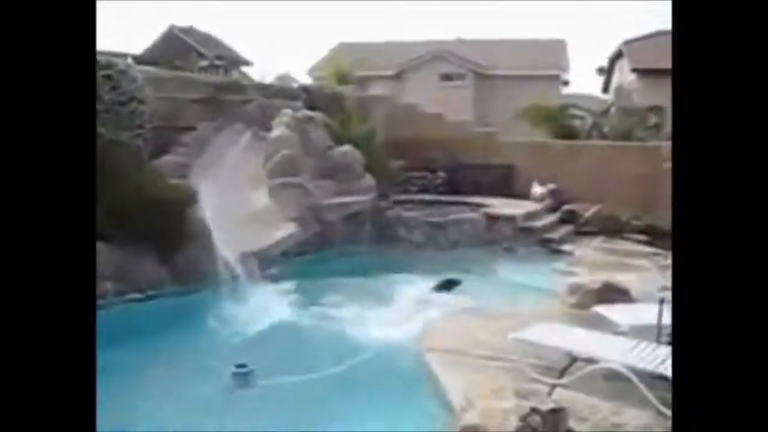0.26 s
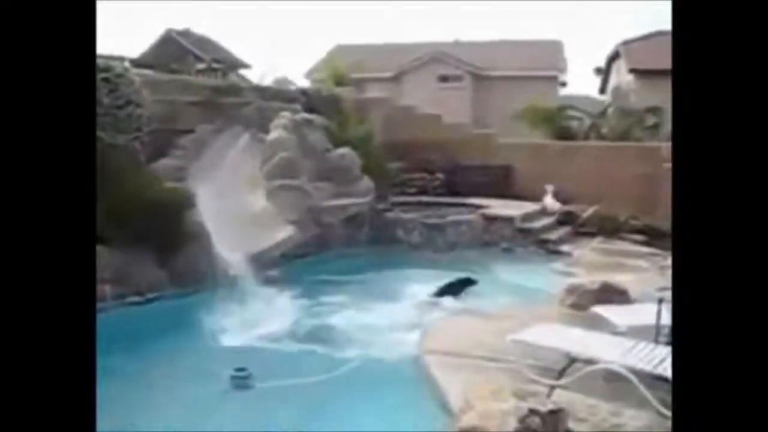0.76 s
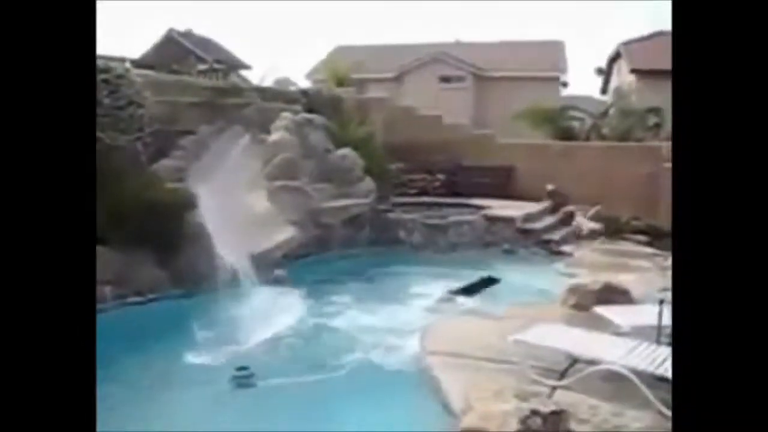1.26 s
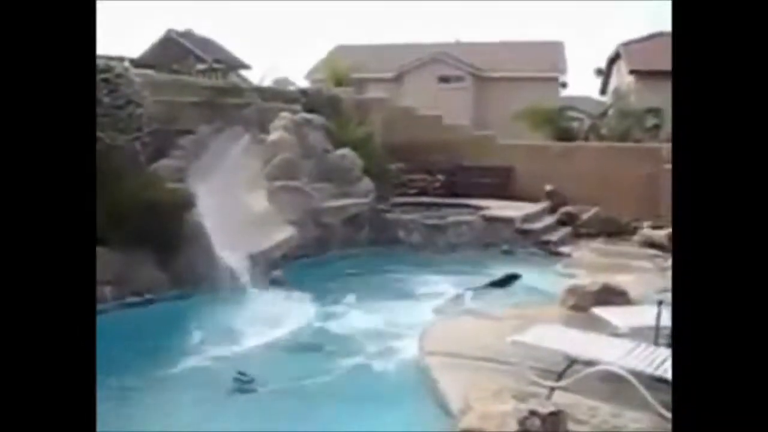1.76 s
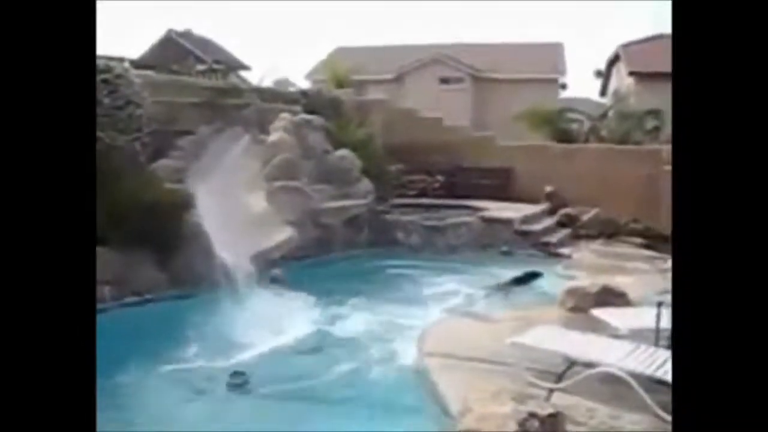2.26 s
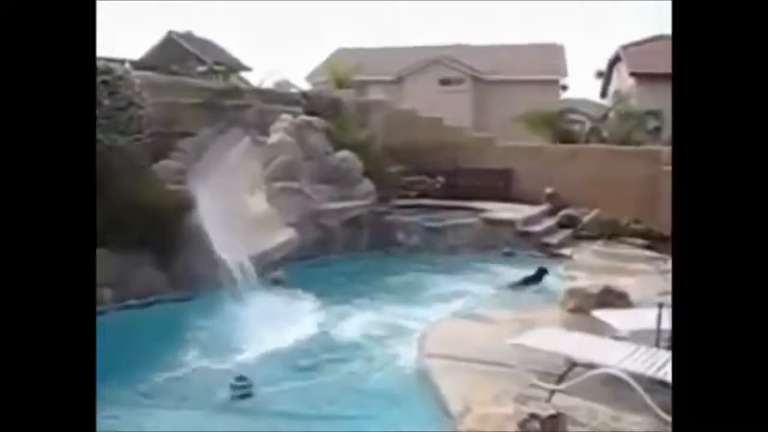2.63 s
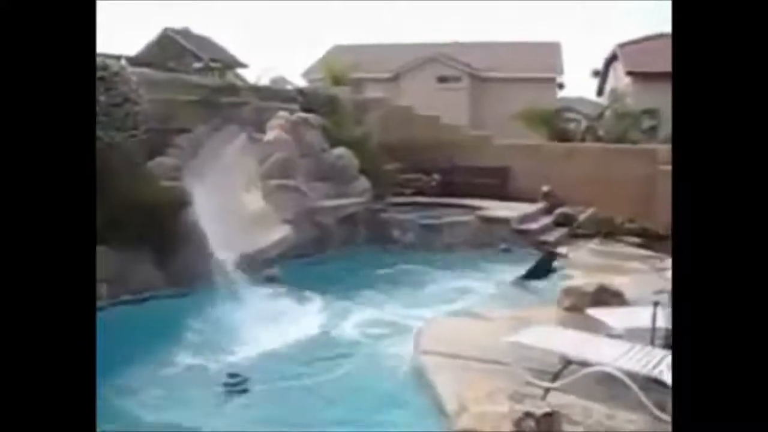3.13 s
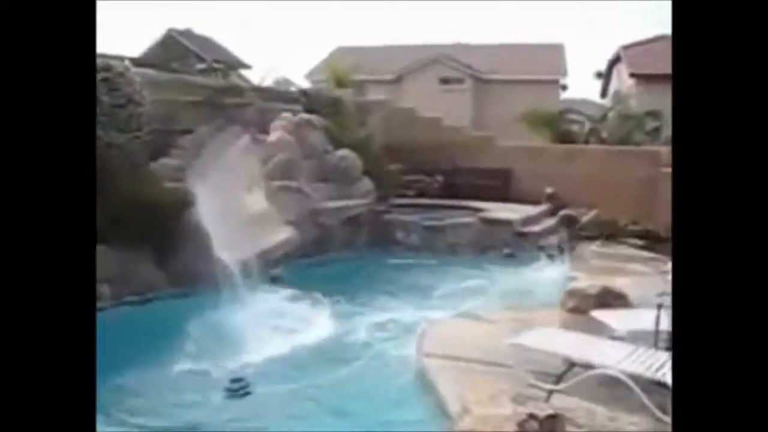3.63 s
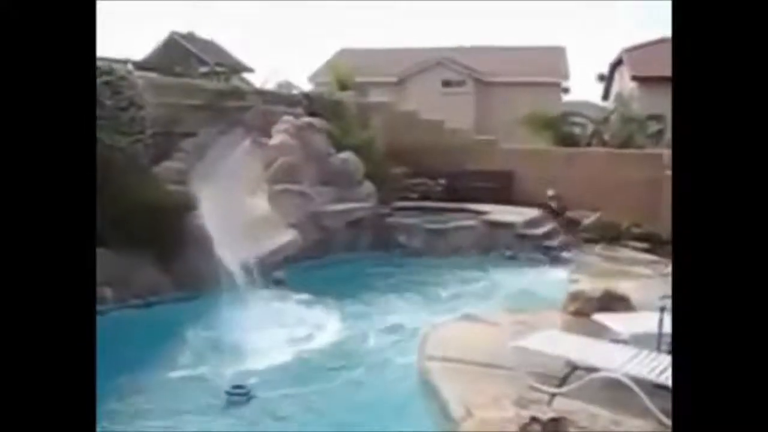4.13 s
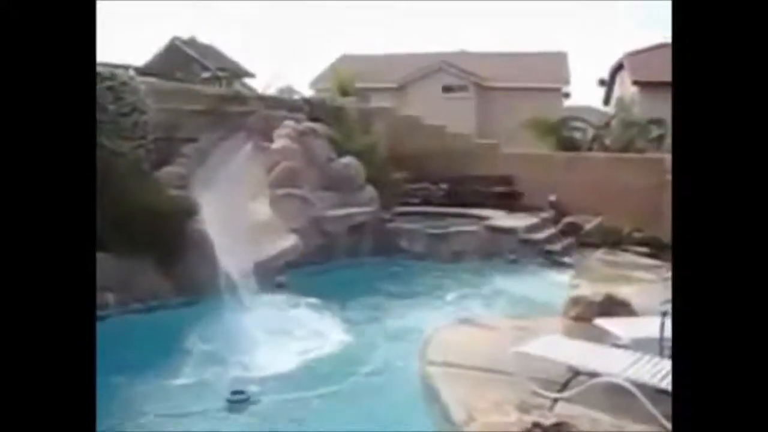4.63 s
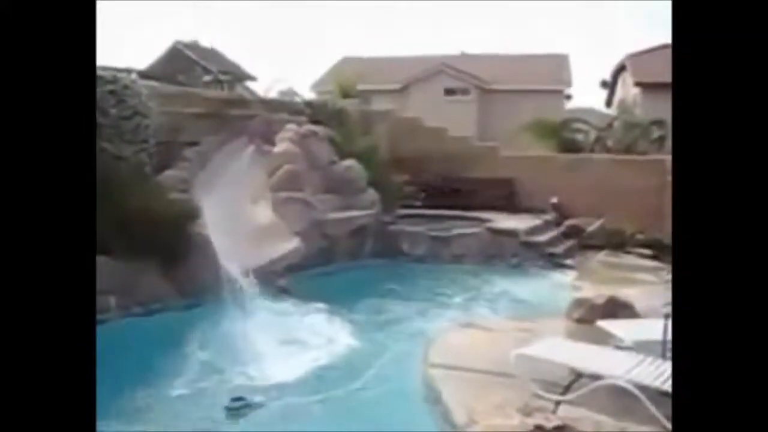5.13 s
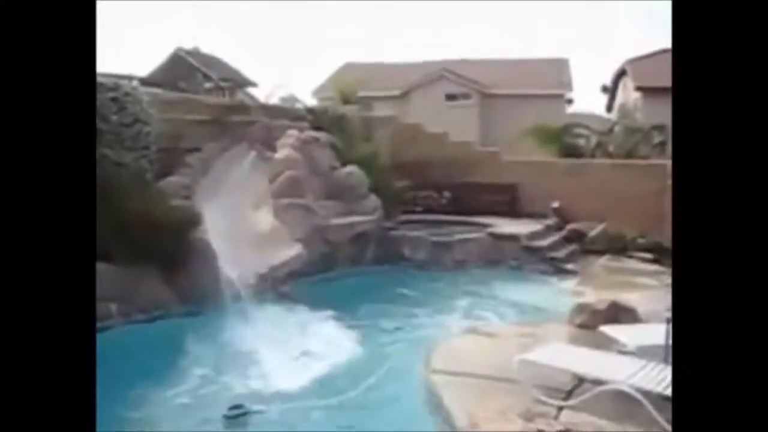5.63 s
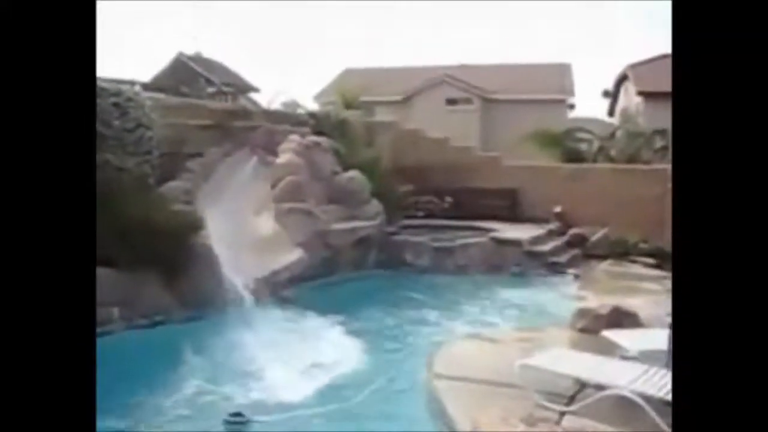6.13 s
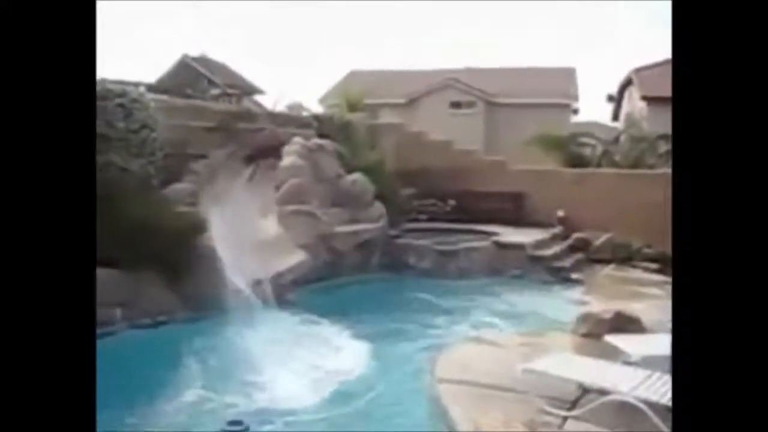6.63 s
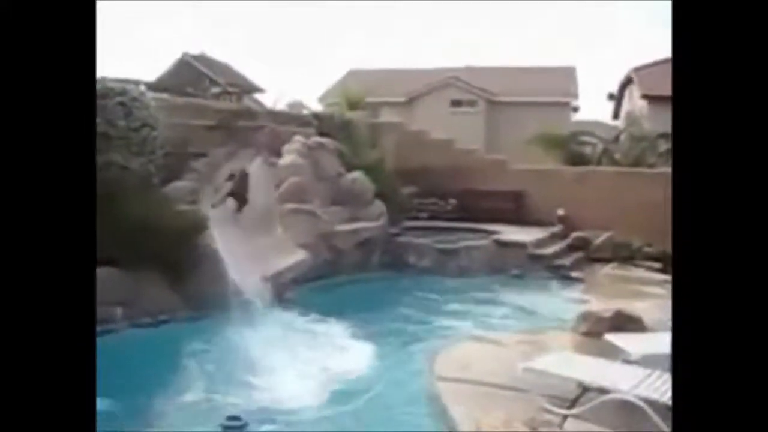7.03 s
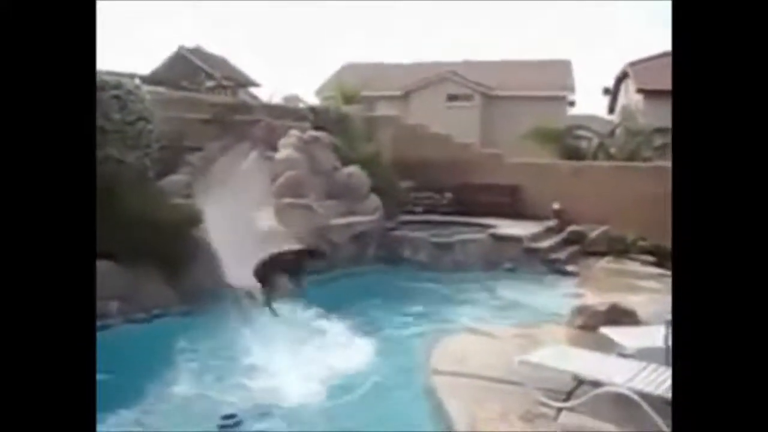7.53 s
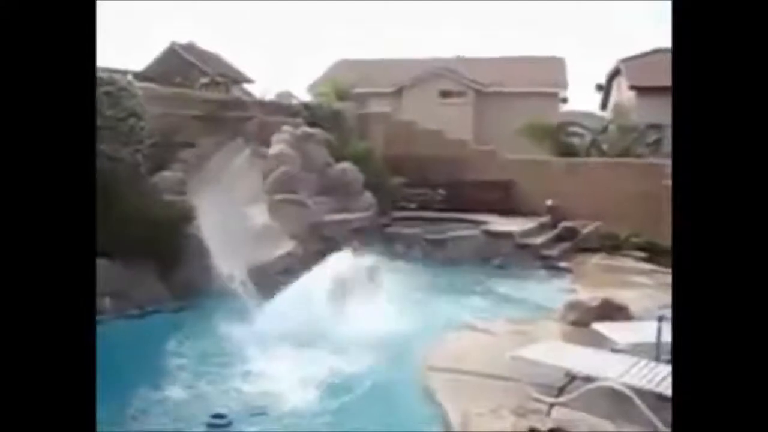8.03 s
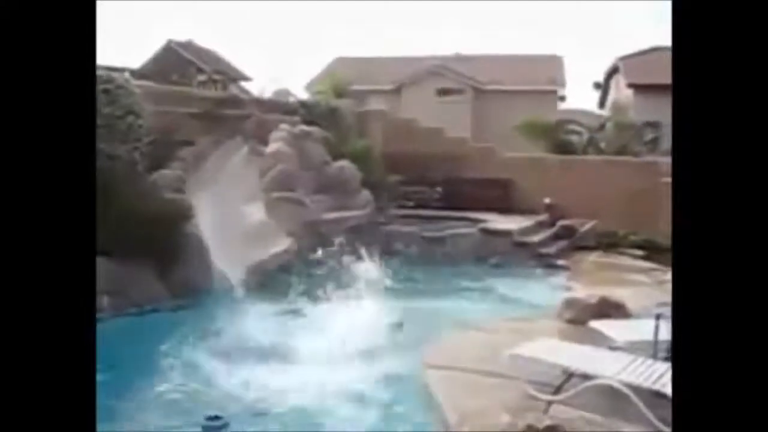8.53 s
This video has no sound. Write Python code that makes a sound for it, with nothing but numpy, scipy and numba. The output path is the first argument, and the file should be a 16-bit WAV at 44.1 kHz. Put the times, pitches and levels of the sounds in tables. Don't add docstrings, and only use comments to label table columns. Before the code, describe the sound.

Outdoor pool heard from across the paving on a small close-paired microphone, nearly mono and slightly dull on top. Steady hissing spray dominates, with soft bubbling, faint low air rumble and a barely audible pump hum. Paddling gurgles come first, then a few hollow plops as the dog leaves the water, then steady pouring, and finally a splash with ringing bubbles and low heaving water.

```python
import sys
import numpy as np
from scipy import signal
from scipy.fft import rfft, irfft
from scipy.io import wavfile
from scipy.ndimage import uniform_filter1d
from numba import njit

SR = 44100
rng = np.random.default_rng(int(sys.argv[2]) if len(sys.argv) > 2 else 0)


def wrap_up_sound(samples):
    columns = np.atleast_2d(samples).T
    tamed = np.clip(columns, -1, 1)
    steps = np.round(tamed * 32767).astype(np.int16)
    wavfile.write(sys.argv[1], SR, steps)


def rack_gain(trim_db):
    fader = np.asarray(trim_db, float)
    return 10 ** (fader / 20)


N = 387149

HZ = np.maximum(np.fft.rfftfreq(N, 1 / SR), 1)
CUTOFF_HZ = 8265


def rms_one(x):
    return x / np.sqrt(np.mean(x ** 2) + 1e-20)


def at_hz(points, hz):
    table_hz, value = np.array(points)[:, 0], np.array(points)[:, 1]
    return np.interp(np.log(hz), np.log(table_hz), value)


def coloured(x, gain_db):
    return irfft(rfft(x) * rack_gain(gain_db), N)


def drift(rate):
    r = np.exp(-80 * np.pi * rate / SR)
    slow = signal.lfilter([1], [1, -2 * r, r * r], rng.standard_normal(N // 40 + 2002))[2000:]
    limited = 2.5 * np.tanh(rms_one(slow) / 2.2)
    return np.interp(np.arange(N) / 40, np.arange(len(slow)), limited)


def swells(rows, attack_s, release_s):
    t = np.arange(N) / SR
    shapes = []
    for s, db, hold in rows:
        rising = (t - s) / attack_s + 1
        falling = 1 - (t - s - hold) / release_s
        shapes.append(db * np.clip(np.minimum(rising, falling), 0, 1))
    return np.max(shapes, axis=0)


@njit
def rings(n, start, step, decay, size, rise):
    out = np.zeros(n)
    for k in range(len(start)):
        phase, height, w = 0., size[k], step[k]
        for i in range(start[k], min(n, start[k] + int(5 / decay[k]))):
            out[i] += height * np.sin(phase) * min(1., phase / 9)
            phase += w
            w *= 1 + rise * decay[k]
            height *= 1 - decay[k]
    return out


def bubbles(low_hz, high_hz, cycles, spread_db, rise, count):
    draw = rng.random((count, 3))
    start = (draw[:, 0] * N).astype(np.int64)
    hz = low_hz + (high_hz - low_hz) * draw[:, 1]
    decay = np.log(1000) * hz / (cycles * SR)
    size = rack_gain(-spread_db * np.log(1 - .995 * draw[:, 2])) * np.sqrt(decay)
    return rms_one(rings(N, start, 2 * np.pi * hz / SR, decay, size, rise))


def foam(low_hz, high_hz, shared_db, own_db, own_rate):
    white = rfft(rng.standard_normal(N))
    together = drift(8.3)
    out = 0
    for octave in np.arange(np.log2(low_hz), np.log2(high_hz), 1 / 3):
        strip = np.cos(np.clip((np.log2(HZ) - octave) * 3, -1, 1) * np.pi / 2) ** 2
        flicker_db = shared_db * together + own_db * drift(own_rate)
        out = out + irfft(white * strip, N) * rack_gain(flicker_db)
    return rms_one(out)


def frames(x):
    return signal.stft(x, nperseg=2048, noverlap=1536)[2]


def unframe(z):
    return signal.istft(z, nperseg=2048, noverlap=1536)[1][..., :N]


def nearby(power):
    over_pitch = uniform_filter1d(power, size=12, axis=0)
    return uniform_filter1d(over_pitch, size=8, axis=1).clip(1e-16)


def blocks(shape, tall, wide):
    draws = rng.random((shape[0] // tall + 1, shape[1] // wide + 1))
    return np.kron(draws, np.ones((tall, wide)))[:shape[0], :shape[1]]


def spray(level_db):
    # [f/Hz, level/dB per Hz]
    spray_colour = [(530, -37), (900, -9.5), (1060, -14), (1270, -4.5), (1870, -8), (2030, -6.5),
                    (2350, -5), (2930, -3), (3580, -1.5), (4420, -2.5), (5510, 0.5), (7450, -6.5),
                    (8020, -8.5), (10400, -15), (17600, -120)]
    fizz = bubbles(890, 8413, cycles=56.0, spread_db=1.5, rise=0.0099, count=30000)
    hiss = foam(773, 9000, shared_db=.5, own_db=.5, own_rate=3.7)
    mixed = hiss + rack_gain(-6.0) * fizz
    return rack_gain(level_db + 1.74) * rms_one(coloured(mixed, at_hz(spray_colour, HZ)))


def churn(level_db):
    # [f/Hz, level/dB per Hz]
    churn_colour = [(120, -54.5), (200, -24.5), (297, -11), (482, -6), (757, 0.5), (852, -1.5), (1540, -5),
                    (1750, -5.5), (1900, -3.5), (2600, 0), (3380, -43), (5720, -120)]
    gurgle = bubbles(200, 2600, cycles=45., spread_db=2.2, rise=.012, count=6000)
    hiss = foam(180, 2800, shared_db=.3, own_db=.5, own_rate=6.)
    mixed = hiss + rack_gain(-9.0) * gurgle
    return rack_gain(level_db + 1.2) * rms_one(coloured(mixed, at_hz(churn_colour, HZ)))


def slosh(level_db):
    # [f/Hz, level/dB per Hz]
    slosh_colour = [(18, -34), (30, -9), (53, 4), (103, -1.5), (163, 1), (220, 1.5), (295, 3), (400, 1),
                    (520, -9), (880, -120)]
    heave = foam(30, 450, shared_db=.4, own_db=.8, own_rate=6.)
    return rack_gain(level_db - 5.0) * rms_one(coloured(heave, at_hz(slosh_colour, HZ)))


def rumble():
    # [f/Hz, level/dB per Hz]
    rumble_colour = [(12, -40), (20, -7), (54, -3.5), (67, -1), (86, -6.5), (130, -1.5), (170, -37),
                     (290, -120)]
    air = foam(21.2, 150, shared_db=-0.5, own_db=4.5, own_rate=7.4)
    return rack_gain(-54.5) * rms_one(coloured(air, at_hz(rumble_colour, HZ)))


def pump():
    # [f/Hz, level/dB rms]
    motor_tones = [(59.5, -62.5), (300, -75), (360, -72), (480, -52)]
    t = np.arange(N) / SR
    hum = 0
    for hz, db in motor_tones:
        tone = np.sin(2 * np.pi * (hz * t + rng.random()))
        hum = hum + rack_gain(db + 1.0) * (0.57 + drift(8.7)) * tone
    return hum


def gloops():
    # [t/s, peak level/dB, f/Hz, 60 dB decay/s]
    pockets = [(0.048, -25, 715, 0.041), (0.217, -26, 747, 0.16), (0.359, -20.5, 684, 0.071),
               (1.289, -28, 690, 0.08), (1.422, -21.5, 930, 0.062), (1.463, -19.5, 995, 0.061),
               (1.692, -24, 724, 0.1), (3.781, -21, 648, 0.08), (3.953, -14, 704, 0.032),
               (8.046, -21, 900, 0.045), (8.13, -20, 957, 0.067), (8.189, -20, 710, 0.045),
               (8.263, -21, 680, 0.077), (8.399, -21.5, 754, 0.11)]
    # [t/s, peak level/dB, f/Hz, 60 dB decay/s]
    deep_pockets = [
        (3.941, -22, 590, 0.073),
        (3.955, -20, 630, 0.098),
    ]
    s, peak_db, hz, t60 = np.transpose(list(pockets) + list(deep_pockets))
    decay = np.log(1000) / (np.clip(t60, .02, .3) * SR)
    return rings(N, (s * SR).astype(np.int64), 2 * np.pi * hz / SR, decay, rack_gain(peak_db + .8), .012)


def plunge():
    # [t/s, level/dB]
    crash = [
        (8.03, -51),
        (8.05, -21),
        (8.10, -23),
        (8.138, -19),
        (8.18, -27),
        (8.26, -50),
    ]
    s, level_db = np.transpose(crash)
    level = rack_gain(np.interp(np.arange(N) / SR, s, level_db, left=-120, right=-120))
    return level * foam(720, 4000, shared_db=3.5, own_db=-1.5, own_rate=25.)


def paving_echoes(x):
    # [f/Hz, width/Hz, level/dB]
    echo_dips = [(993, 180, -1), (2354, 223, -5), (4300, 580, -0.5)]
    dips_db = sum(db * np.exp(-((HZ - hz) / width) ** 2 * 2) for hz, width, db in echo_dips)
    return coloured(x, dips_db)


def yard_echoes(x):
    z = frames(x)
    scattered = unframe(z * np.exp(2j * np.pi * rng.random(z.shape)))
    return rms_one(scattered) * np.std(x)


def ports(direct, diffuse):
    # [f/Hz, likeness from 0 to 1]
    likeness = [(60, 0.91), (300, 0.94), (900, 0.98), (2000, 0.99), (4000, 0.89), (6000, 0.99),
                (8100, 0.59), (10500, 1), (13000, .1)]
    alike = np.clip(at_hz(likeness, HZ), 0, 1)
    half_lag = np.exp(1j * np.pi * HZ * 2.0e-5)
    mid = rfft(direct) * np.sqrt((1 + alike) / 2)
    side = rfft(diffuse) * np.sqrt((1 - alike) / 2)
    return np.array([irfft((mid + side) / half_lag, N), irfft((mid - side) * half_lag, N)])


def speckled_hiss():
    # [f/Hz, level/dB per Hz]
    hiss_colour = [(8300, -11), (9000, 3.5), (10000, 1), (11900, -0.5), (12200, 0.5), (15000, -0.5),
                   (15600, -8)]
    # [f/Hz, share of bands kept, share of cells kept]
    speckle = [(8300, .03, .3), (9400, .14, .3), (9700, .7, .18), (11000, 1, .24), (12000, 1, .24),
               (12300, 1, .08), (15000, 1, .08), (15200, .05, .1)]
    noise = rng.standard_normal(N)
    z = frames(coloured(noise, at_hz(hiss_colour, HZ) - 90 * (HZ < CUTOFF_HZ)))
    hz = np.arange(len(z)) * SR / 2048
    table_hz, bands, cells = np.transpose(speckle)
    kept = blocks(z.shape, 16, 3) < np.interp(hz, table_hz, bands)[:, None]
    kept &= blocks(z.shape, 2, 3) < np.interp(hz, table_hz, cells)[:, None]
    return rack_gain(-52) * rms_one(unframe(z * kept))


def camera_storage(x, sharpen, starved_db):
    z = frames(x)
    power = np.abs(z.sum(axis=0)) ** 2
    starved = rack_gain(starved_db * (blocks(power.shape, 4, 4) < .05))
    contrast = (power / nearby(power)) ** sharpen
    stored = unframe(z * starved * contrast)
    return coloured(stored, -60 * np.clip((HZ - CUTOFF_HZ) / 200, 0, 1.5))


def side_dropouts(x):
    # [f/Hz, level/dB relative to the middle]
    side_kept = [(100, -18.5), (600, -19), (1200, -14), (2000, -13.5), (3000, -15.5), (8200, -17),
                 (8400, 9), (10600, 6), (12000, -3)]
    mid, side = frames(x[0] + x[1]), frames(x[0] - x[1])
    side_power = uniform_filter1d(np.abs(side) ** 2, size=6, axis=0)
    band = side_power[::6, ::2] / nearby(np.abs(mid) ** 2)[::6, ::2]
    band = np.repeat(np.repeat(band, 6, axis=0), 2, axis=1)[:len(mid), :mid.shape[1]]
    least = rack_gain(2 * at_hz(side_kept, np.arange(1, len(mid) + 1) * SR / 2048))
    lost = unframe(side * (band < least[:, None])) / 2
    return x - lost * [[1], [-1]]


def scene():
    # [t/s, churn rise/dB, hold/s]
    stirs = [(0.01, 4.5, 0.23), (0.3, 6.5, 0.17), (0.56, 3, .05), (1.44, 4, .04), (2.76, 2.5, 0.076),
             (3.62, 3.5, .05), (3.78, 6.5, 0.069), (3.87, 6, 0.023), (4.18, 4.5, 0.026), (4.44, 3, 0.036),
             (5.16, 2, 0.062), (6.53, 1.5, 0.045), (7.18, 3, 0.017), (8.0, 3.5, .03), (8.07, 6., 0.091),
             (8.2, 7., .03), (8.3, 3.5, 0.12), (8.44, 6.5, .1), (8.56, 7.5, .3)]
    # [t/s, slosh rise/dB, hold/s]
    heaves = [(1.03, 1, .02), (1.42, 9, 0.048), (1.93, 9., 0.037), (2.57, 7., .03), (3.53, 7, .01),
              (3.99, 11, .02), (4.18, 5, .03), (4.52, 5, .02), (4.72, 10, .03), (6.03, 7, .03),
              (6.53, 4, .02), (7.07, 5, .03), (7.75, 7, .05), (8.12, 19.5, .16), (8.32, 18.5, .06),
              (8.41, 25, .04), (8.5, 18.5, 0.048)]
    # [t/s, spray loss/dB, hold/s]
    spray_gap = (8.18, 1.7, 0.15)
    stir_db = swells(stirs, attack_s=0.064, release_s=0.14)
    gap_db = swells([spray_gap], attack_s=0.064, release_s=0.14)
    heave_db = swells(heaves, attack_s=0.11, release_s=.1)

    spray_db = -22 - 0.096 * stir_db - gap_db + .35 * drift(5.1)
    churn_db = -32 + stir_db + 0.67 * drift(5.1)
    calm = np.clip(1 - heave_db / 20, .2, 1)
    slosh_db = -49.5 + heave_db + 3. * calm * drift(5.)

    water = spray(spray_db) + churn(churn_db) + slosh(slosh_db) + gloops() + plunge()
    pool = paving_echoes(water + rumble()) + pump()
    return ports(pool, yard_echoes(pool))


def roll_off(x):
    return signal.sosfilt(signal.butter(12, 15700, fs=SR, output="sos"), x)


def record(dry):
    rounded = .5 * np.tanh(dry / .5)
    stored = camera_storage(rounded, sharpen=0.19, starved_db=-11.0)
    hiss = ports(speckled_hiss(), speckled_hiss())
    return roll_off(side_dropouts(stored + hiss))


dry = scene()
out = record(dry)
wrap_up_sound(out)
```